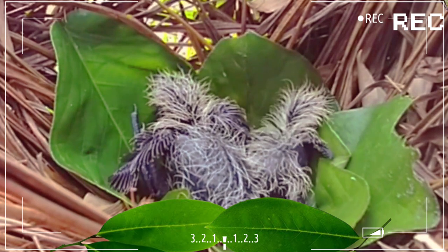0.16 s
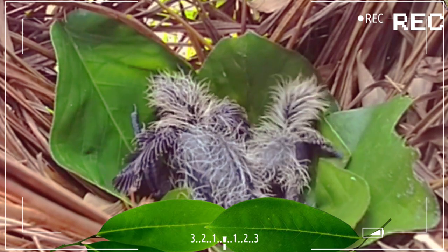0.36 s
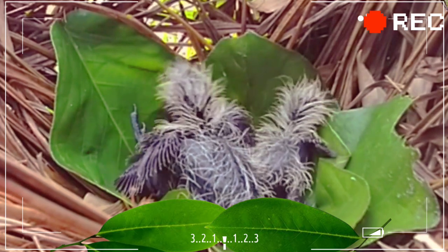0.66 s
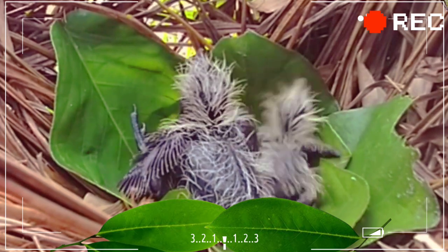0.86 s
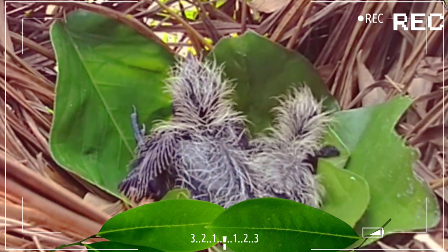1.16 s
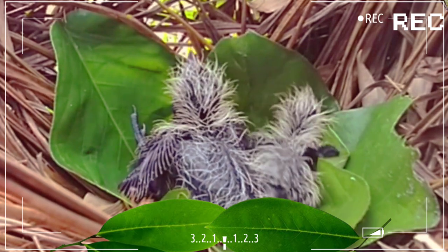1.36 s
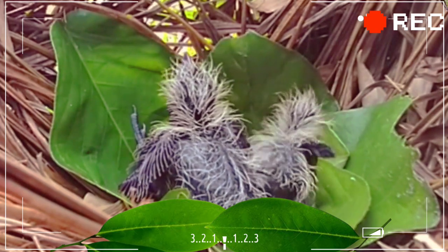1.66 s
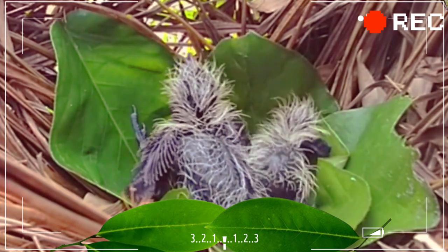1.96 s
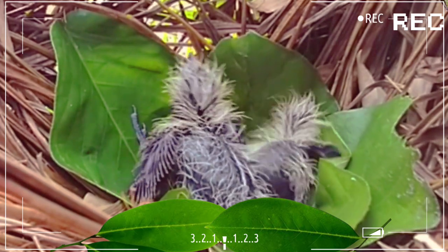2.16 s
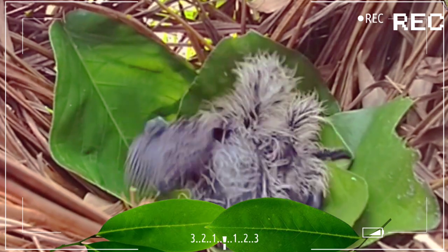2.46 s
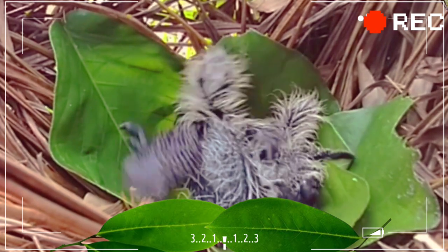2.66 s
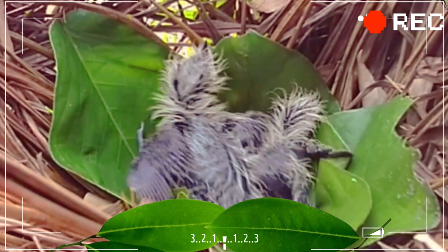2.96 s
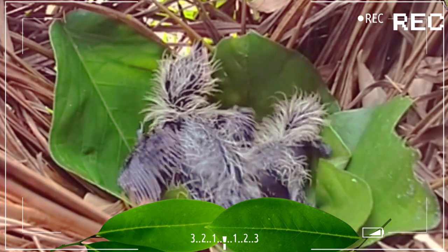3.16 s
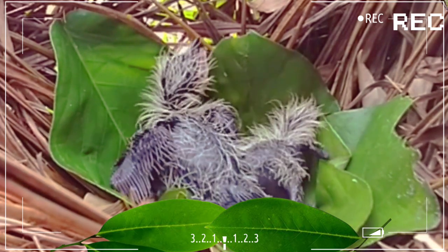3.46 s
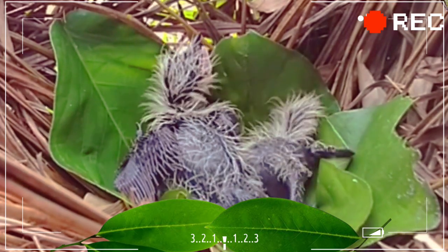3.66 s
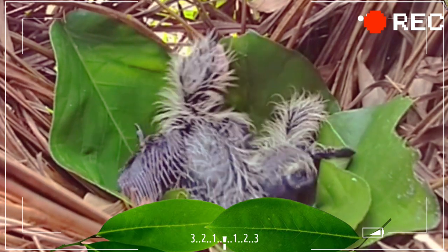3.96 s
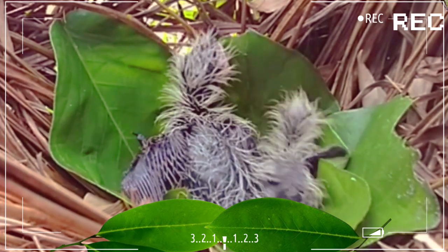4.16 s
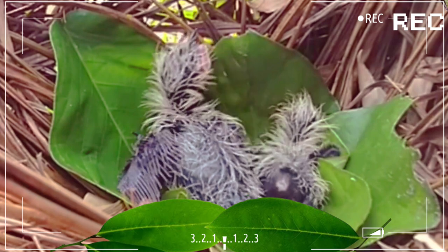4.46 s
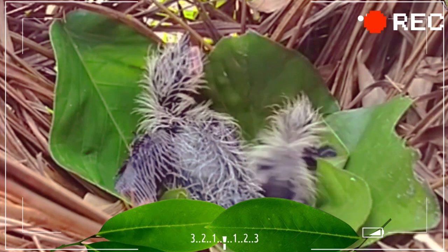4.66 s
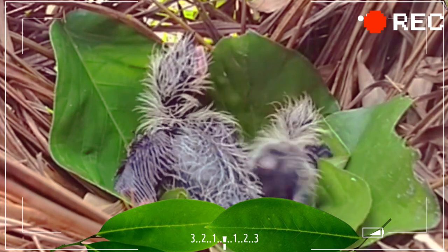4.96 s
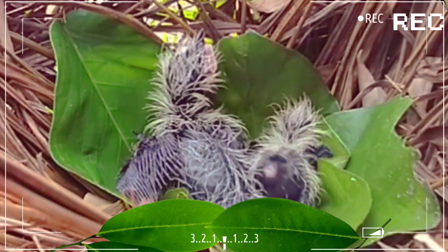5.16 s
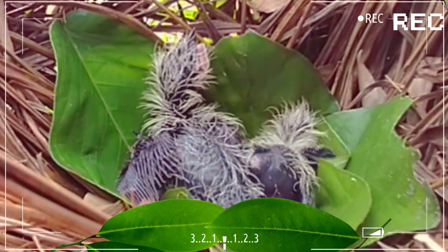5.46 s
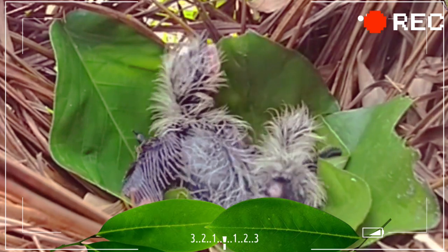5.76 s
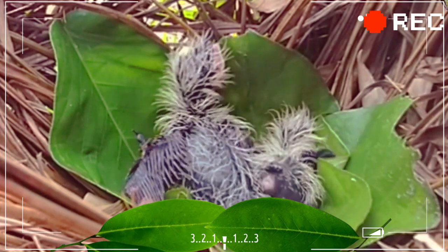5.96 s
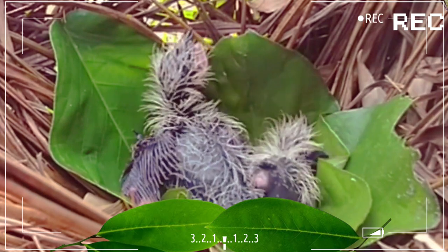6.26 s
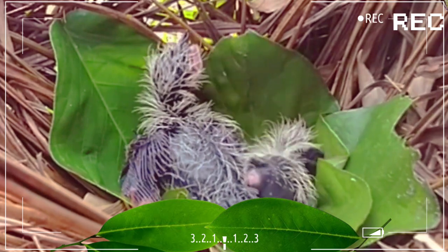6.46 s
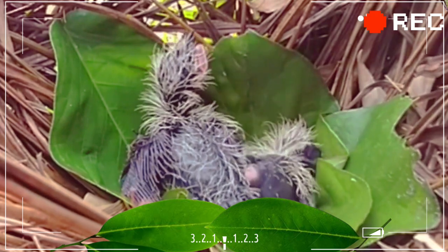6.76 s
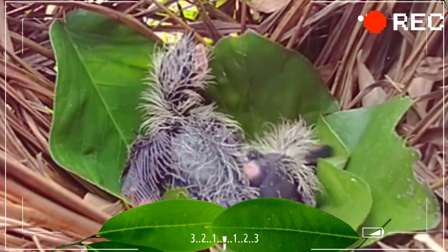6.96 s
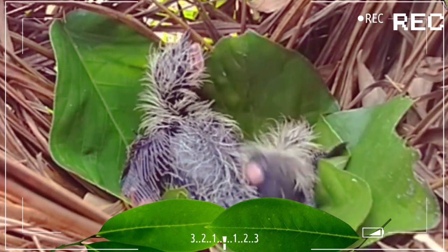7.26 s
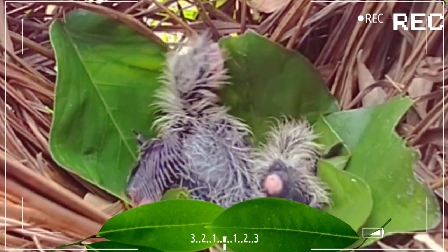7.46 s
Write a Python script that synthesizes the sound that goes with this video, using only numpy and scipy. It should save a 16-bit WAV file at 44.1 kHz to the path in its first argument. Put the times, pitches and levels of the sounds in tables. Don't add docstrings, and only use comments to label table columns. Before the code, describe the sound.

A quiet thicket with light wind, faint high insects and dry snaps opens with a wavering pure whistle. After a pause filled with rustles and woody knocks, a chick near the microphone begins steady harsh puffs of hiss with a fluttering onset. A softer second whistle passes behind, with a faint low engine hum. Later the rasps grow brighter, another chick overlaps, sharp beak clicks appear and wind bumps the microphone.

```python
import sys
import numpy as np
from scipy import signal
from scipy.io import wavfile
from scipy.ndimage import uniform_filter1d

SR = 44100
rng = np.random.default_rng(int(sys.argv[2]) if len(sys.argv) > 2 else 0)


def log_audio(samples):
    frames = np.atleast_2d(samples).T
    limited = np.clip(frames, -1, 1)
    pcm = np.round(limited * 32767).astype(np.int16)
    wavfile.write(sys.argv[1], SR, pcm)


def elevation(decibels):
    levels = np.asarray(decibels, float)
    return 10 ** (levels / 20)


N = 336042
T = np.arange(N) / SR


def evened(x):
    return x / np.sqrt(np.mean(x ** 2) + 1e-20)


def columns(rows, t, **ends):
    s, *values = np.transpose(rows)
    return [np.interp(t, s, v, **ends) for v in values]


def bump(x, centre, width):
    return np.exp(-((x - centre) / width) ** 2)


def band(x, lo_hz, hi_hz, order=2):
    return signal.sosfilt(signal.butter(order, [lo_hz, hi_hz], "bandpass", fs=SR, output="sos"), x)


def band_noise(lo_hz, hi_hz, order=2):
    return evened(band(rng.standard_normal(N), lo_hz, hi_hz, order))


def wander(n, size):
    return evened(uniform_filter1d(rng.standard_normal(n), size))


def colour(x, gain, size=256):
    hop = dict(nperseg=size, noverlap=3 * size // 4)
    hz, t, z = signal.stft(x, SR, **hop)
    return signal.istft(z * gain(hz[:, None], t), SR, **hop)[1][:N]


def noise(points, patchy_db):
    f, db = np.transpose(points)

    def gain(hz, t):
        grain = rng.standard_normal((len(t), len(hz)))
        grain = uniform_filter1d(grain, size=8, axis=0)
        patches = evened(uniform_filter1d(grain, size=24, axis=1)).T
        return elevation(np.interp(np.log(hz + 1), np.log(f), db) + patchy_db * patches)
    return evened(colour(rng.standard_normal(N), gain, size=1024))


# [t/s, f/Hz, level/dB]
CALLS = [
    [(0, 1993, -27.5), (.05, 1986, -24.5), (.078, 1996, -26.5), (.105, 2000, -25.5), (.15, 1997, -27.5),
     (.27, 2015, -26), (.33, 2023, -27.5), (.44, 2007, -29), (.505, 2030, -32), (.52, 1965, -44)],
    [(4.072, 2030, -50), (4.088, 2030, -43), (4.15, 1980, -33), (4.25, 2010, -35.5), (4.38, 2030, -28),
     (4.45, 2080, -28.5), (4.7, 1997, -25.5), (4.815, 2017, -28), (4.84, 1970, -37)],
]
# [t/s, pitch drop/Hz, level drop/dB]
TRILL = [(.066, 18, 2.5), (.119, 53, 5), (0.175, 130, 11), (0.234, 136, 9.5), (0.293, 85, 5.5),
         (.352, 45, -0.5), (4.415, 56, 8), (4.472, 200, 4), (4.505, -54, 1), (4.531, 210, 4),
         (4.589, 153, 5), (4.651, 96, 8), (4.706, 19, 1.5)]
# [multiple, level/dB]
OVERTONES = [(1, 0.5), (2, -42), (3, -18.5), (4, -29.5), (5, -45)]
# [delay/s, level/dB]
ECHOES = [(.038, -18.5), (.075, -30), (.105, -30), (.14, -31)]


def whistler():
    out = np.zeros(N)
    for rows in CALLS:
        at = slice(round(rows[0][0] * SR), round(rows[-1][0] * SR))
        t = T[at]
        hz, db = columns(rows, t)
        steady_db = db
        for s, drop_hz, drop_db in TRILL:
            w = .008 + .000035 * drop_hz
            side_s = np.where(t > s, 1.3 * w, w)
            pinch = np.exp(-np.abs((t - s) / side_s) ** 1.49)
            hz = hz + drop_hz * (.3 * bump(t, s, .05) - pinch)
            db = db - drop_db * bump(t, s + 0.46 * w, 0.61 * w)
            db = db + .022 * drop_hz * bump(t, s - .45 * w, .5 * w)
        db = db - .05 * np.maximum(hz - 2060, 0)
        veil_db = 0.5 * np.maximum(2030 - hz, 0)
        turn = 2 * np.pi * np.cumsum(hz) / SR
        tone = 0
        for k, level in OVERTONES:
            k_db = level + 0.69 * (k - 1) * np.minimum(db - steady_db, 0)
            if k > 1:
                k_db = k_db - 0.82 * rows[0][0] - veil_db * (1 if k % 2 else 0.19)
            tone = tone + elevation(k_db) * np.sin(k * turn)
        out[at] += np.sqrt(2) * elevation(db) * tone
    return out + sum(elevation(db) * np.pad(out, (round(s * SR), 0))[:N] for s, db in ECHOES)


def add_far_note(out, start, length, top_db, pitch, throb_db=0):
    u = np.linspace(0, 1, round(length * SR))
    db = top_db - 7 * (2 * u - 1) ** 2 - throb_db * np.sin(np.pi * 26.5 * length * u) ** 2
    db = db + 2.2 * wander(len(u), 400)
    hz = pitch(u) + 16 * wander(len(u), 300)
    tone = np.sin(2 * np.pi * np.cumsum(hz) / SR) * signal.windows.tukey(len(u), .2)
    out[round(start * SR):][:len(u)] += np.sqrt(2) * elevation(db) * tone


# [t/s, length/s, top f/Hz, level/dB]
COOS = [
    (.05, .07, 870, -62),
    (.18, .14, 930, -58),
    (.305, .21, 635, -56),
    (.37, .13, 490, -62),
]
# [t/s, length/s,
# from f/Hz, to f/Hz, level/dB]
SLIDES = [(0, .17, 630, 530, -60), (.04, .12, 1690, 1500, -63), (.07, .03, 3450, 3350, -62),
          (.402, .018, 1500, 1450, -47), (.545, .095, 1480, 1900, -60), (.625, .115, 1880, 2170, -58),
          (.73, .07, 2175, 2180, -65), (1.0, .035, 2500, 2450, -61), (1.45, .09, 2600, 2400, -66),
          (1.72, .1, 1000, 1130, -67), (2.51, .05, 2500, 2450, -57), (2.752, .05, 1200, 1400, -46),
          (3.17, .035, 750, 900, -56), (3.595, .022, 1420, 1380, -47), (3.822, .022, 1420, 1380, -47),
          (3.835, .04, 3350, 3250, -59)]


def far_birds():
    out = np.zeros(N)
    for s, length, f, db in COOS:
        add_far_note(out, s, length, db, lambda u: f * (1 - .19 * (2 * u - 1) ** 2))
    purr = (.88, .42, 650, 570, -55)
    for row in SLIDES + [purr]:
        s, length, a, b, db = row
        glide = lambda u: a + (b - a) * np.sin(np.pi * u / 2)
        add_far_note(out, s, length, db, glide, throb_db=12 if row is purr else 0)
    return out


# [f/Hz, level/dB per Hz]
AIR = [(12, -35), (20, 28), (49, -7), (225, -26), (264, -10), (884, -7.5), (1070, -57), (1220, -15),
       (4430, -26.5), (6630, -13), (7380, -55), (9150, -28), (12300, -0.5), (16000, -49), (22000, -120)]


def air():
    bed = noise(AIR, patchy_db=4.5)
    return elevation(-56) * bed / np.std(band(bed, 150, 12300, order=4))


# [t/s, level/dB]
BREEZE = [
    (0, -52.5),
    (1.4, -56.5),
    (1.51, -56),
    (1.9, -56),
    (2.75, -52.5),
    (4.12, -50.5),
    (5.67, -53),
    (6.53, -46),
    (7.62, -48.5),
]
# [t/s, level/dB]
THUMPS = [
    (6.33, -48),
    (6.389, -54),
    (6.48, -43.5),
    (6.59, -39.5),
    (6.88, -40.5),
    (7.19, -38.5),
]


def wind():
    wind_db = columns(BREEZE, T)[0]
    knocks = elevation(-74 + 4.6 * (wind_db + 51))
    knocks = knocks + sum(elevation(db) * bump(T, s, 0.023) for s, db in THUMPS)
    return band_noise(30, 58, order=1) * elevation(wind_db) + band_noise(110, 740) * knocks


# [t/s, level/dB]
STIR = [
    (0, -66),
    (.85, -72),
    (1.0, -67.5),
    (1.4, -74),
    (1.9, -74.5),
    (2.12, -64.5),
    (2.28, -64.5),
    (2.34, -56),
    (2.5, -62),
    (2.75, -59),
]
# [f/Hz, level/dB per Hz]
RUSTLE = [(88, -46), (150, -5), (331, -1), (377, 0), (1060, 2), (1770, 0), (1980, 1), (4540, -12),
          (6100, -3.5), (8000, -10.5), (12300, -5), (16000, -37), (22000, -120)]
# [t/s, half length/s, level/dB]
GUSTS = [
    (.005, 0.021, 11.5),
    (.245, 0.075, 20),
    (0.486, 0.044, 11),
    (.7, 0.054, 6),
]


def leaves():
    rustle_db = columns(STIR, T)[0]
    gusts_db = sum(db / (1 + ((T - s) / half) ** 2) for s, half, db in GUSTS)
    fizz_db = rustle_db + 8 + gusts_db - np.clip(2.7 * (T - 3.6), 0, 4.0)
    specks = (rng.random(N) < 90 / SR) * np.minimum(rng.exponential(100, N), 160)
    crackle = 1 + .5 * uniform_filter1d(specks, 100)
    rustle = noise(RUSTLE, patchy_db=1.3) * crackle
    rustle = rustle / np.std(band(rustle, 2400, 4500, order=4))
    fizz_shape = [(6000, -30), (9500, -13), (11000, -6), (12300, 0), (12600, -60)]  # f/Hz, dB
    fizz = noise(fizz_shape, patchy_db=2.0) * crackle
    settle = elevation(-np.clip(20.0 * (T - 2.75), 0, 11.0))
    return settle * elevation(rustle_db + 3.0) * rustle + elevation(fizz_db) * evened(fizz)


# [t/s, length/s, level/dB]
CHIRRS = [
    (0.01, 0.53, -59),
    (.7, 0.55, -63),
    (1.52, 0.49, -63),
    (2.1, 0.43, -66),
]


def insects():
    swell = elevation(-80)
    for s, length, db in CHIRRS:
        u = np.clip((T - s) / length, 0, 1)
        swell = swell + elevation(db - 14 * (1 - u) ** 2) * (T > s) * (T < s + length)
    return elevation(-60.5) * band_noise(6670, 6860) + swell * band_noise(9380, 9560)


def ticks(rows, ring_s=0.009, crack_s=.008, knock_s=0.026):
    out, t = np.zeros(N + 2000), T[:2000]
    for s, db, hz, crack_db in rows:
        grit = rng.standard_normal(2000)
        ring = np.sin(2 * np.pi * hz * t) * elevation(-60 * t / (ring_s + 3.5 / hz))
        knock = band(grit, 0.61 * hz, min(1.31 * hz, 15000), order=1) * elevation(8.5 - 60 * t / knock_s)
        crack = band(grit, max(2500, 0.89 * hz), 18000, order=3) * elevation(crack_db - 60 * t / crack_s)
        share = np.sqrt(max(1 - elevation(2 * crack_db), .05))
        out[round(s * SR):][:2000] += elevation(db) * (share * (0.8 * ring + knock) + 0.76 * crack)
    return band(out[:N], 190, 16000)


# [t/s, peak level/dB, ring f/Hz, crack level/dB]
TWIGS = [(.159, -33, 3500, 2), (.171, -25, 696, 0), (0.183, -37, 2680, -7), (0.29, -33, 1420, -4),
         (0.321, -34, 3000, 4), (.409, -37, 1500, -8), (.499, -40, 1530, -4), (.54, -42, 7070, 0),
         (.679, -42, 5000, 5), (.95, -50, 3000, -8), (1.0, -43, 1200, -12), (1.01, -43, 2280, -10),
         (1.1, -37, 800, -1), (1.335, -35, 300, -18), (1.337, -40, 700, -14), (1.342, -37, 1300, -12),
         (1.451, -41, 1500, -14), (1.975, -37, 2400, 0), (2.01, -44, 2500, 0), (2.038, -38, 3000, 0),
         (2.043, -40, 2500, 2), (2.111, -43, 1800, -4), (2.182, -24, 520, -12), (2.183, -31, 2300, -8),
         (2.19, -34, 1240, -5), (2.41, -38, 1200, -18), (2.437, -18, 680, -18), (2.438, -29, 2400, -14),
         (2.544, -38, 450, -15), (2.575, -34, 2600, -6), (2.574, -27, 7000, 6), (2.595, -31, 900, -8),
         (2.612, -27, 950, -12), (2.613, -30, 2300, -8), (3.581, -30, 1370, -8), (7.364, -23, 1590, -8),
         (7.377, -9, 6000, 3)]
# [t/s, peak level/dB]
SNAPS = [(0.0507, -41), (0.158, -30), (0.169, -29), (0.2923, -26.5), (0.339, -36), (0.5406, -37),
         (0.6498, -43), (0.8269, -41), (0.8633, -35), (1.1133, -40), (1.3732, -43), (1.844, -50),
         (1.8999, -50), (1.9498, -41), (1.974, -36), (2.0014, -32), (2.1091, -36), (2.272, -28),
         (2.2804, -49), (2.3015, -42), (2.7955, -37)]


def twigs():
    return ticks(TWIGS + [(s, db - 1, 11600, 13.5) for s, db in SNAPS])


# [t/s, f/Hz, level/dB]
HUM = [
    (2.2, 42, -70),
    (2.5, 43, -57),
    (3.22, 44.2, -51.5),
    (3.5, 44.3, -48.5),
    (4.4, 43.7, -45.5),
    (4.85, 43.8, -51),
    (4.95, 44.1, -57),
    (5.25, 44, -49),
    (5.6, 44.1, -63),
    (6.2, 44.3, -70),
]


def engine():
    hz, db = columns(HUM, T, left=-70, right=-70)
    waver = evened(uniform_filter1d(uniform_filter1d(rng.standard_normal(N), size=3000), size=3000))
    return np.sqrt(2) * elevation(db + 2.2 * waver) * np.sin(2 * np.pi * np.cumsum(hz) / SR)


# [t/s, peak level/dB]
BEAK = [(2.574, -24), (2.587, -38), (4.169, -14), (6.188, -24), (6.204, -13), (6.387, -8), (6.455, -11),
        (6.88, -12), (6.887, -15), (7.363, -24), (7.366, -21), (7.369, -24),
        (2.811, -40), (2.852, -32), (2.862, -29), (2.918, -38), (3.374, -34), (3.978, -24), (4.049, -29),
          (4.085, -27), (6.43, -11), (6.662, -16), (6.857, -12), (6.986, -16), (7.354, -15)]


def beaks():
    return ticks([(s, db, 10600, 13.5) for s, db in BEAK])


# [t/s, rise/s, length/s, peak level/dB, dulling/dB]
RASPS = [(2.747, 0.18, 0.2, -38, 2), (2.994, 0.047, 0.18, -26.5, 9), (3.208, 0.075, 0.18, -26, 11),
         (3.43, 0.053, 0.21, -20.5, 13), (3.659, 0.058, 0.2, -19, 10), (3.877, 0.065, 0.2, -21, 9),
         (4.088, 0.068, 0.21, -20.5, 9), (4.315, 0.049, 0.2, -18.5, 9), (4.54, 0.063, 0.2, -21, 16.5),
         (4.773, 0.044, 0.19, -21.5, 11), (4.993, 0.04, 0.19, -20, 9.5), (5.243, 0.035, 0.18, -23, 4),
         (5.472, 0.055, 0.19, -22, 2.5), (5.784, 0.043, 0.2, -18.5, -1), (6.013, 0.069, 0.22, -16.5, -1),
         (6.232, .035, 0.2, -19, -1.5), (6.438, 0.086, 0.19, -16.5, -0.5), (6.666, 0.043, 0.24, -18, 2.5),
         (6.876, 0.067, 0.26, -16.5, 0.5), (7.123, 0.047, 0.22, -17.5, 1), (7.378, 0.053, 0.19, -18.5, 3.5),
         (7.571, 0.06, 0.19, -17.5, 0)]
# [t/s, rise/s, length/s, peak level/dB, dulling/dB]
SIBLING = [
    (5.899, 0.11, 0.42, -37, 0),
    (6.109, 0.03, 0.44, -35, -7),
    (6.32, 0.028, 0.18, -27.5, -8),
    (6.539, 0.055, 0.25, -24.5, -5.5),
    (6.76, 0.043, 0.19, -30, -9),
    (6.99, 0.053, 0.084, -24.5, 10),
    (7.04, 0.05, 0.17, -38.5, -8),
    (7.22, 0.047, 0.18, -34, -7),
    (7.48, 0.035, 0.31, -30, -2.5),
]
# [beak opens/s, push ends/s, drop after push/dB, side band level/dB, top level/dB]
PUSH = [(0.0095, .15, 6, 5, 2), (0.0044, 0.08, 3.5, 8.5, -2.5), (0.012, 0.075, 4, 0.5, 1),
        (.014, 0.073, 4.5, -3, 0.5), (0.013, 0.07, 4, -6, 0), (0.0059, 0.07, 5, -0.5, 0.5),
        (0.014, 0.074, 4.5, 2, -3.5), (0.0062, 0.068, 5.5, -5, 1), (0.0042, 0.075, 3.5, -6, 6.5),
        (0.007, 0.084, 2.5, -1.5, 2), (0.0089, 0.085, 3, 4, -2.5), (0.01, 0.069, 1.5, 10.5, -4.5),
        (0.0086, 0.077, 5.5, -1.5, 4.5), (0.012, 0.071, 5, 4, -4), (0.0065, 0.078, 5, -6.5, -3.5),
        (0.0043, 0.081, 3.5, -3, 2.5), (0.019, .1, 3, 1, -2), (0.016, 0.096, 2, -1.5, 2.5),
        (0.023, 0.13, 4, -1, -2), (0.016, 0.083, 1.5, -3, 1), (0.0045, 0.083, 1.5, -0.5, 0.5),
        (0.019, .08, 4, -2, -4.5)]
# [s, s, dB, dB, dB]
SIBLING_PUSH = (0.023, 0.06, 1.6, 0, 1.2)
STOPS = [4, 5, 9.7, 2.5, 3.2, 2.9, 3, 3.6, 3.24, 3.6, 3.8, 3.6, 4.1, 4.2, 3.7, 4.9, 3.7, 4.4, 3.3, 3.6, 4.4,
         3.7]
POPS = [16, 16, 14, 19, 18, 18, 20, 20, 17, 18, 19, 11, 14, 18, 18, 13, 18.5, 15, 13, 19.5, 17, 17]


def breaths(t):
    power, bright = np.full(len(t), 1e-8), np.zeros(len(t))
    count = len(SIBLING)
    shapes = zip(RASPS + SIBLING, PUSH + [SIBLING_PUSH] * count, STOPS + [4] * count, POPS + [18.5] * count)
    for (start, rise, length, peak_db, dull_db), (opens, ends, drop_db, _, top_db), bend, pop_db in shapes:
        at = slice(*np.searchsorted(t, [start, start + length]))
        since = t[at] - start
        unopened = np.clip((rise - since) / max(rise - opens, .005), 0, 1)
        fall = np.clip((since - rise) / (length - rise), 0, 1)
        db = peak_db - 12 * unopened ** 2.7
        db = db - 5.5 * fall - 36.5 * fall ** bend
        db = db - drop_db * np.clip((since - ends) / 0.0078 + .5, 0, 1)
        db = np.where(since < opens, peak_db - pop_db + since / opens, db)
        harder_db = -1.5 + top_db + 0.67 * (peak_db + 20.5)
        dulled_db = dull_db * np.clip((since - ends) / 0.04 + .5, 0, 1)
        power[at] += elevation(2 * db)
        bright[at] += elevation(2 * db) * (harder_db - dulled_db)
    return 10 * np.log10(power), bright / power


def flutter(starts):
    since = np.abs(T - starts[np.maximum(np.searchsorted(starts, T) - 1, 0)])
    rate_hz = 270 + 90 * (1 - np.exp(-since / .06))
    turns = np.cumsum(rate_hz * np.exp(.17 * wander(N, 200))) / SR
    strength = elevation(1.5 * rng.standard_normal(N))[turns.astype(int)]
    beat = np.sin(np.pi * np.sqrt(turns % 1)) ** 4
    clear = np.exp(-since / .045) * np.where(T > SIBLING[0][0], .6, 1)
    puffs = (1.0 - .85 * clear + (.55 + .45 * clear) * strength * beat) * rng.standard_normal(N)
    snaps = evened(strength * np.diff(np.floor(turns - .2), prepend=-1))
    drive = puffs + (.1 + .2 * clear) * snaps
    return drive / np.sqrt(uniform_filter1d(drive ** 2, size=1500))


# [f/Hz, width/Hz, level/dB]
CAVITIES = [(203, 196, -12), (4690, 64, -6), (2640, 280, -5), (3730, 130, 5.5), (5660, 66, -22),
            (7350, 240, -1.5), (9500, 360, 1), (11600, 200, 1)]


def throat(modes, hz):
    peaks = sum(elevation(2 * db) / (1 + (2 * (hz - f) / w) ** 2) ** 1.63 for f, w, db in modes)
    return 10 * np.log10(peaks) + sum(db * bump(hz, f, w) for f, w, db in CAVITIES)


# [f/Hz, width/Hz]
MOUTH_BANDS = [(1750, 1100), (3000, 860), (4250, 380), (5050, 290), (11400, 740)]
# [level in each mouth band/dB, five columns]
GAPE = [(0.43, 1.5, 0.1, 0.1, 0.1), (-0.16, -1, 0.1, 0.1, 9), (1, 0, 0.1, 0.1, 10.5),
        (0.84, 1.5, 0.1, 1.2, 6.5), (0.84, -0.8, 0.1, 0.1, -3), (-1.5, 1.2, 1.1, 0.1, -2),
        (-1.2, 2.5, 3.4, 0.1, 9), (0.22, 1.8, 0.97, 0.1, -8), (0.66, -1.5, 0.47, 0.1, -6),
        (-1.4, -1.5, 1.24, 0.1, -7), (-2, 1.5, 1.1, 0.1, -8), (-1.94, 0.5, 1.1, 0.11, 6),
        (-1.6, -0.5, 1.2, 0.1, -11), (-1.5, -1.5, 1.5, 1.37, 4), (-2.1, 0.8, 0.097, 0.1, -0.5),
        (0.8, -1.5, 0.93, 0.095, -5), (1, 1.5, 2.1, 0.1, 3), (0.57, 0.5, 0.11, 0.091, -3),
        (-0.89, -0.5, 0.1, 0.1, -0.5), (0.12, 0.5, 0.1, 0.1, -2.5), (-0.0018, -1, 0.1, 0.102, -0.5),
        (-1.5, -1.5, 0.1, 0.13, 7)]
CREST = [.1, .1, .1, 1.1, 1.1, .1, .1, 1.1, .1, 1.1, 1.1, .1, .1, .1, 2.1, 2.4, 2.1, 2.3, 2.8, 2.2, 2, 1.1]


def mouth(hz, breath):
    side_db = np.array([0] + [row[3] for row in PUSH])[breath] * bump(hz, 8360, 1030)
    centre, width = np.transpose(MOUTH_BANDS)
    gape_db = bump(hz, centre, width) @ np.array(GAPE[:1] + GAPE)[breath].T
    return side_db + gape_db + np.array([0] + CREST)[breath] * bump(hz, 10070, 350)


# [t/s, turned to the microphone 0-1, throat length factor]
HEAD = [(2.8, 0.34, 1.06), (3.05, 0.23, 1.046), (3.27, 0.17, 1.055), (3.5, 0.06, 1.03), (3.72, 0.27, 1.06),
        (3.93, 0.5, 1.04), (4.15, 0.48, 1.076), (4.6, 0.5, 1.039), (5.05, 1, 1.045), (5.3, 0.71, 1.08),
        (5.55, 1, 1.036), (5.85, 0.59, 1.073), (6.1, 0.88, 1.035), (6.9, 0.96, 1.04), (7.6, 0.63, 1.055)]
# [f/Hz, width/Hz, level/dB]
AWAY = [(544.7, 26, -12.5), (1410, 1100, -23), (2030, 120, -13.5), (3370, 960, -15), (5270, 1000, 2),
        (6670, 1060, 0.5), (8760, 810, -3.5), (10820, 450, 1.5), (12900, 650, -10)]
# [f/Hz, width/Hz, level/dB]
FACING = [(504, 52, -14.5), (1285, 270, -22), (1865, 1580, -19.5), (3030, 610, -19.5), (4413, 485, -15),
          (6116, 440, -6.5), (6440, 940, -6.5), (8220, 470, -8.5), (9110, 360, -7), (10380, 850, -1),
          (12320, 2100, -1.5)]
# [effort level/dB, chest share/dB]
CHEST = [(-74, -19), (-58, 3.5), (-25.5, -13), (-25, -14), (-13, -20)]
# [delay/ms, level/dB]
LEAVES = [(2.9, -15), (4.7, -14), (7.9, -14), (12.7, -17)]


def nestlings(patchy_db=2.4):
    starts = np.array([r[0] for r in RASPS])
    ends = np.array([0] + [r[0] + r[2] for r in RASPS])
    hiss = flutter(starts)
    hiss = evened(hiss + sum(elevation(db) * np.roll(hiss, round(ms * SR / 1000)) for ms, db in LEAVES))
    posture, shift = rng.standard_normal((2, len(starts) + 1, 257))

    def gain(hz, t):
        facing, length = columns(HEAD, t)
        facing, breath = np.clip(facing, 0, 1), np.searchsorted(starts, t)
        left_s = ends[breath] - t
        moved = hz * length * (1 + 0.015 * np.clip(.5 - left_s / 0.15, -.5, .5))
        turn = 1.1 * np.clip(.5 - left_s / .2, -.5, .5)
        first, second = (evened(uniform_filter1d(p, size=2, axis=1))[breath].T for p in (posture, shift))
        ripple_db = patchy_db * (np.cos(turn) * first + np.sin(turn) * second)
        throat_db = (1 - facing) * throat(AWAY, moved) + facing * throat(FACING, moved)
        power = elevation(2 * (throat_db + ripple_db))

        def share(lo, hi):
            inside = (hz[:, 0] > lo) & (hz[:, 0] < hi)
            return 10 * np.log10(power[inside].sum(0) / len(hz))
        effort_db, bright_db = breaths(t)
        core = share(4500, 7500)
        chest_db = columns(CHEST, effort_db)[0]
        low = np.clip((4500 - hz) / 2500, 0, 1) * (chest_db + core - share(400, 1700))
        high = np.clip((hz - 7000) / 1500, 0, 1) * (bright_db + core - share(8500, 12300))
        closing = np.clip(left_s / .07, 0, 1)
        hooked = (ends[breath] < SIBLING[0][0]) * (t < ends[breath] + .01)
        hook = 12 * hooked * (1 - closing) * bump(hz, 1100 + 1000 * closing, 110)
        gap = -8 * bump(hz, 3880 - 320 * facing, 150)
        return np.sqrt(power) * elevation(low + high - core + hook + gap + mouth(hz, breath))
    effort = uniform_filter1d(elevation(breaths(T)[0]), size=40)
    return effort * colour(hiss, gain, size=512)


def scene():
    birds = whistler() + far_birds() + nestlings() + beaks()
    thicket = air() + wind() + leaves() + insects() + twigs()
    return (birds + thicket + engine())[None]


def roll_off(x):
    return signal.sosfilt(signal.butter(12, 12460, fs=SR, output="sos"), x)


def record(dry):
    edge = signal.firwin(511, 12380, window=("kaiser", 6.5), fs=SR)
    soft = .52 * np.tanh(dry / .52)
    return roll_off(signal.oaconvolve(soft, edge[None], "same"))


dry = scene()
out = record(dry)
log_audio(out)
```